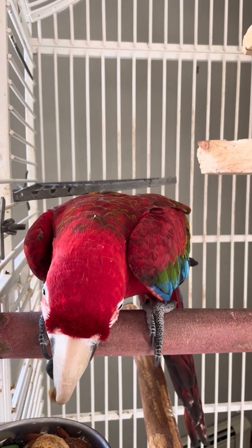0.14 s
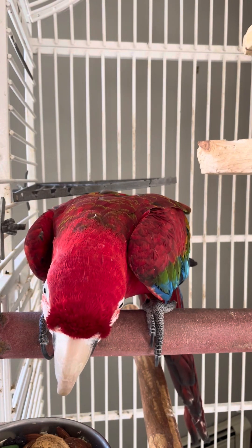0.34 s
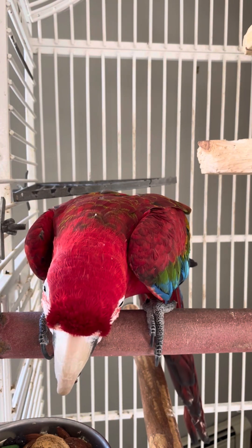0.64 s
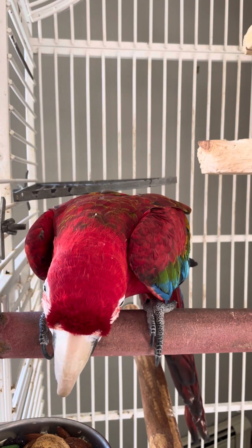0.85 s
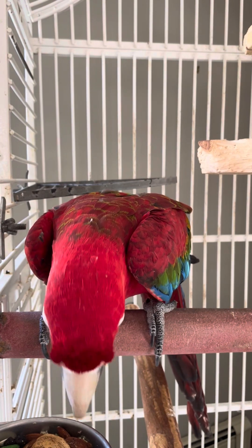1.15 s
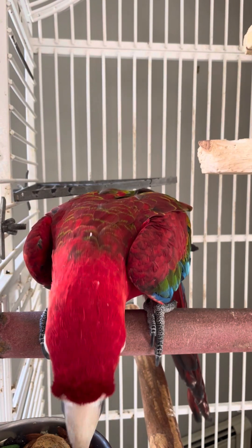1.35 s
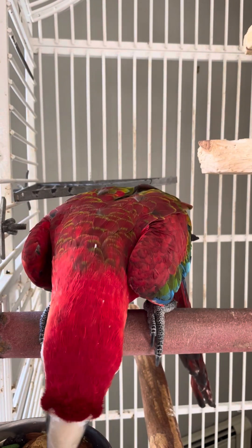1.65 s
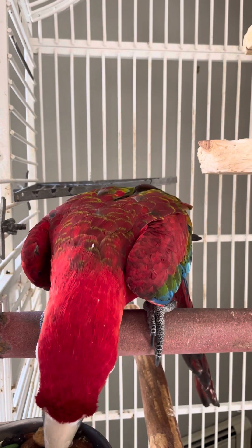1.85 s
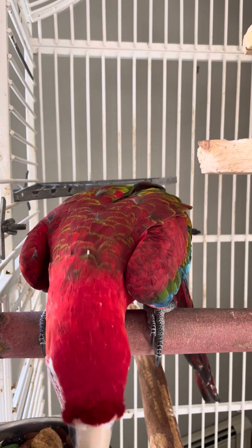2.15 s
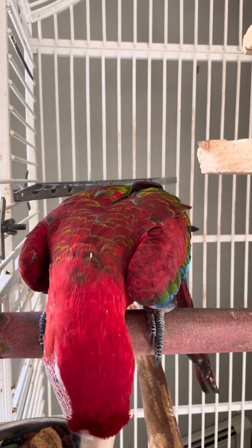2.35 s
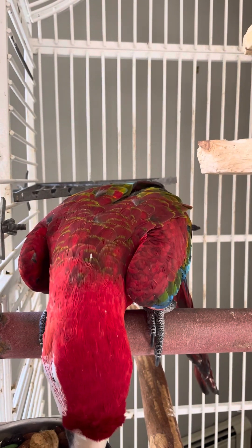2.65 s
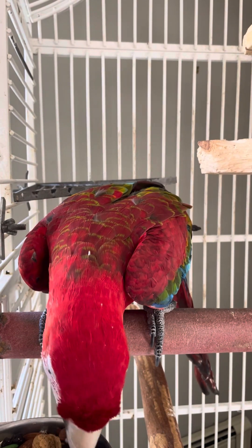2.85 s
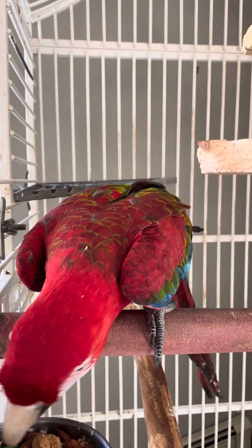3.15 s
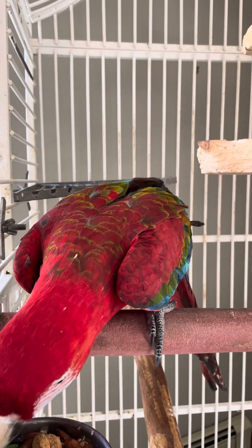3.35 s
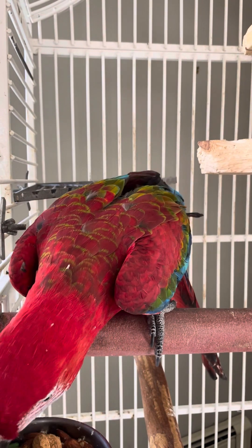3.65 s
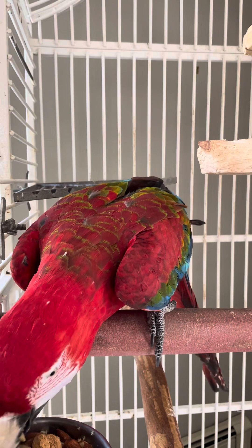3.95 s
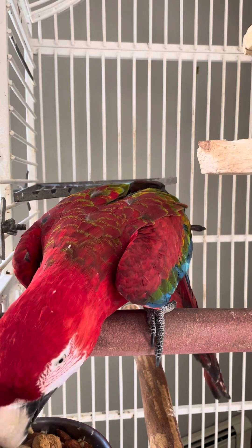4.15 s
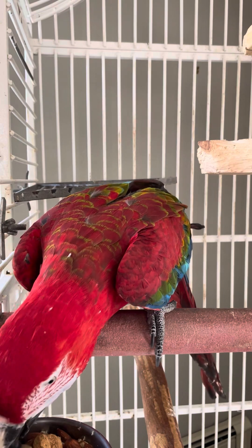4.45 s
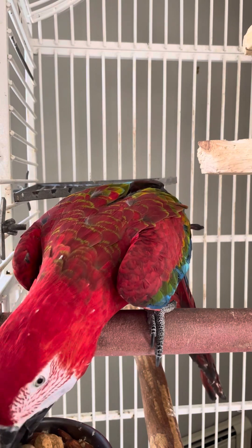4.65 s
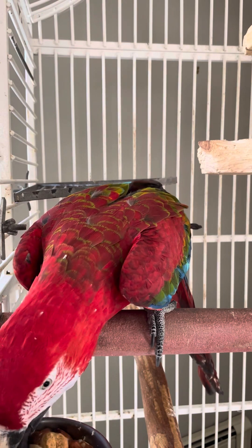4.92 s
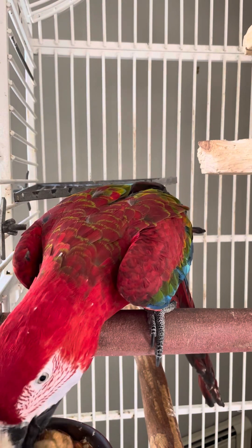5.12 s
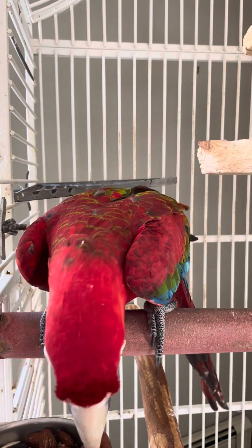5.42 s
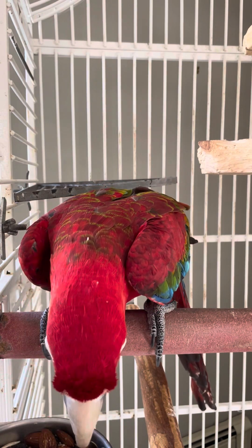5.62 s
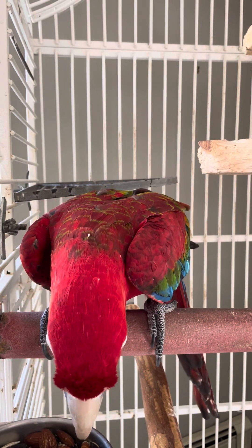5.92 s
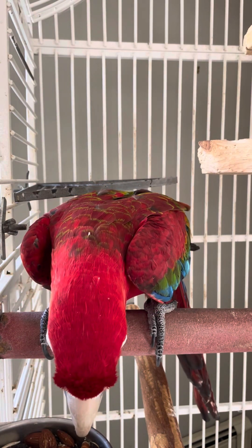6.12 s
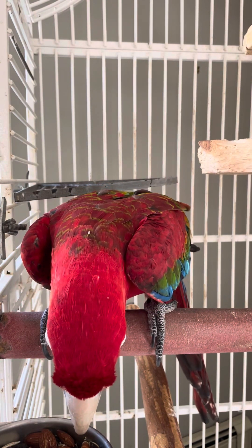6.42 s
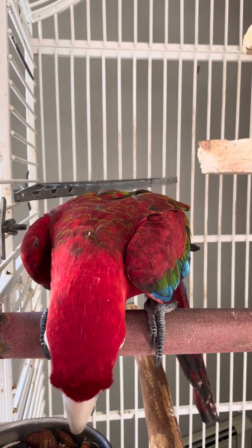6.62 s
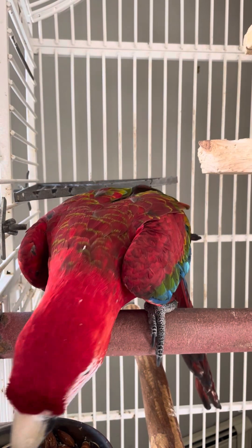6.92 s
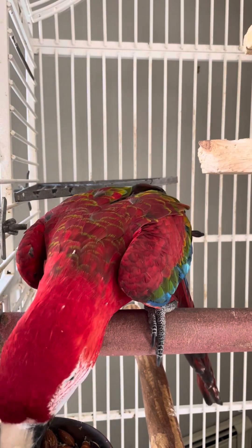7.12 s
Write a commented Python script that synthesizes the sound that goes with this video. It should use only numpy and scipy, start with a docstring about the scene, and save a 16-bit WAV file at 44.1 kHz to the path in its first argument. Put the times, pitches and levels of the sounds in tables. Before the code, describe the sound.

A large parrot nibbles nuts from a steel bowl, its beak ticking and knocking, with a brief loud clatter in a quiet room.

```python
"""The hum and hiss of a quiet home, then a large parrot's beak ticking on nuts in a steel food bowl.
Stirred seeds and shells crackle, and the cage rumbles as it rocks under the bird. Knocks of the beak
ring the bowl, thump its holder and set the bars singing, hardest between five and six seconds.
It all plays close to a two-port phone microphone, with a widened midrange and a short room tail."""
import sys
import numpy as np
from scipy import signal
from scipy.fft import rfft, irfft, next_fast_len
from scipy.io import wavfile
from scipy.ndimage import uniform_filter1d

SR = 44100
rng = np.random.default_rng(int(sys.argv[2]) if len(sys.argv) > 2 else 0)


def digitize_waveform(pressure):
    """Quantize a signal to 16-bit integers and store it at the path in sys.argv[1].

    Rows of a 2-D input are taken as channels; values are limited to [-1, 1].
    """
    field = np.atleast_2d(pressure).T
    bounded = np.clip(field, -1, 1)
    quanta = np.round(bounded * 32767).astype(np.int16)
    wavfile.write(sys.argv[1], SR, quanta)


N = 320772


def amp(db):
    """Decibels to gain."""
    return 10 ** (np.asarray(db) / 20)


def unit_rms(x):
    """Scales a signal to an rms of 1."""
    return x / np.sqrt(np.mean(x ** 2) + 1e-20)


def curve_at(points, hz):
    """Reads a curve along a log-frequency axis."""
    point_hz, value = np.transpose(points)
    return np.interp(np.log(hz + 1), np.log(point_hz + 1), value)


def place(mix, start_s, sound):
    """Drops a sound into the mix."""
    part = mix[round(start_s * SR):][:len(sound)]
    part += sound[:len(part)]


def band(x, low_hz, high_hz):
    """Causal band-pass."""
    return signal.sosfilt(signal.butter(2, [low_hz, min(high_hz, SR / 2.2)], "band", fs=SR, output="sos"), x)


def wander(span):
    """Random drift of rms 1, smoothed twice over span samples."""
    return unit_rms(uniform_filter1d(uniform_filter1d(rng.standard_normal(N), span), span))


# How alike diffuse sound is at the two ports: freq_hz, coherence
PORT_COHERENCE = [(60, 0.83), (200, 0.98), (400, 0.52), (1000, 0.088), (1800, 0.89), (2400, 0.28),
                  (4400, 0.21), (5200, 0.52), (7000, 1)]
def diffuse(spectra, hz):
    """Blends two unrelated spectrograms into a partly alike left and right."""
    alike = np.clip(curve_at(PORT_COHERENCE, hz), -1, 1)[:, None]
    return np.array([spectra[0], alike * spectra[0] + np.sqrt(1 - alike ** 2) * spectra[1]])


# Colour of the hiss: freq_hz, relative_db
HISS_COLOUR = [(30, -53.5), (45, -6), (120, -3), (300, -1.5), (550, -7), (800, -8), (1900, -19.5),
               (2500, -18.5), (4400, -32.5), (5600, -25.5), (6500, -15), (7600, -14), (8400, -51.5),
               (14500, -40)]
# Duct resonances: centre_hz, width_hz, boost_db
DUCT_PEAKS = [(231.7, 160, 6.5), (1074, 170, 7), (1655, 130, 8.5), (2158, 110, 11.5)]
def ventilation(level_db=-56.5):
    """A bed of air noise with broad duct peaks; patches of its spectrum swell and fade."""
    frames, hz = N // 256 + 5, np.fft.rfftfreq(1024, 1 / SR)
    re_a, im_a, re_b, im_b, patches = rng.standard_normal((frames, 513, 5)).T
    patches = unit_rms(uniform_filter1d(uniform_filter1d(patches, 12, axis=0), 14, axis=1))
    drift_db = 2 * patches * np.minimum(hz / 600, 1)[:, None]
    ducts_db = sum(boost / (1 + (2 * (hz - centre) / width) ** 2) for centre, width, boost in DUCT_PEAKS)
    colour_db = curve_at(HISS_COLOUR, hz) + ducts_db
    spectra = diffuse([re_a + 1j * im_a, re_b + 1j * im_b], hz) * amp(colour_db[:, None] + drift_db)
    return amp(level_db) * unit_rms(signal.istft(spectra, nperseg=1024, noverlap=768)[1][:, :N])


# Appliance tones: pitch_hz, rms_db
HUM_TONES = [(425.3, -72), (473.7, -74.5), (500.6, -72), (522.2, -70)]
def appliance_hum():
    """Faint tones that waver by about a decibel, each with its own phase at each port."""
    hum = np.zeros((2, N))
    for pitch_hz, rms_db in HUM_TONES:
        waver_db = unit_rms(uniform_filter1d(rng.standard_normal(N), 8000))
        phase = 2 * np.pi * pitch_hz * np.arange(N) / SR + rng.uniform(0, 4.8, (2, 1))
        hum += np.sqrt(2) * amp(rms_db + waver_db) * np.sin(phase)
    return hum


# Fader ride of the rumble: time_s, level_db
RUMBLE_RIDE = [(0, -74), (1.8, -69), (2.25, -60.5), (4.2, -71.5), (5.1, -57.5), (5.6, -62.5), (5.8, -50),
               (6.3, -56), (7.27, -63.5)]
def cage_rumble():
    """The frame rumbles low as the cage rocks under the bird."""
    time_s, level_db = np.transpose(RUMBLE_RIDE)
    rumble = unit_rms(band(band(rng.standard_normal(N), 33, 150), 33, 150))
    return rumble * amp(np.interp(np.arange(N) / SR, time_s, level_db))


# Fader ride of the stirring: time_s, gain_db
STIR_RIDE = [(0, -89), (1.0, -90), (1.9, -88.5), (2.25, -79), (2.9, -81.5), (3.1, -93), (3.4, -77.5),
             (4.2, -92), (4.45, -77.5), (5.08, -76), (5.221, -59), (5.45, -78.5), (5.74, -78), (5.84, -51),
             (5.93, -57), (6.051, -58), (6.25, -81.5), (6.599, -95), (7.27, -81)]
def food_crackle(grains_per_s=3000, settle_s=0.028):
    """Seeds and shells click in clumps, stirred in fits and thrown about by each cued knock or click."""
    t = np.arange(N) / SR
    clumps = amp(3.2 * wander(700))
    sizes = amp(np.minimum(rng.exponential(1, N), 5)) * rng.choice([-1, 1], N)
    grains = sizes * clumps * (rng.random(N) < grains_per_s / SR)
    crackle = unit_rms(band(grains, 7700, 11670)) + amp(5) * unit_rms(band(grains, 1143, 7600))
    time_s, gain_db = np.transpose(STIR_RIDE)
    fits_db = 2.5 * wander(SR // 14)
    stirred = amp(np.interp(t, time_s, gain_db) + fits_db)
    thrown = sum((t > start_s) * amp(-51 + 0.7 * level_db) * np.exp(-abs(t - start_s) / settle_s)
                 for start_s, level_db, *_ in KNOCK_CUES + CLICK_CUES)
    return crackle * (stirred + thrown)


def contact(level_db, centre_hz, width_oct, crack_db, scrape_ms, noise):
    """A hard tick and a short scrape through the hollow of beak and shell, a bright crack on top."""
    t = np.arange(len(noise)) / SR
    width_oct = max(width_oct, 0.1)
    tick = np.zeros(len(noise))
    tick[8] = 3 + (5 + 8 / width_oct) / max(scrape_ms, 1)
    scrape = (noise + tick) * (1 - np.exp(-t / 0.000067)) * np.exp(-1000 * t / scrape_ms)
    spread = 2 ** (width_oct / 2)
    blow = band(scrape, centre_hz / spread, centre_hz * spread)
    crack = band(scrape, 6780, 12400)
    return amp(level_db) * (blow / abs(blow).max() + amp(crack_db) * crack / abs(crack).max())


def ring(modes, t, gain_db, chance):
    """Dying modes; two rows of chance vary their strength (the blow) and tuning (the loose load)."""
    pitch_hz, level_db, t60_s = np.transpose(modes)[:, :, None]
    size, detune = chance[:, :len(modes), None]
    envelope = (np.sign(size) + 0.2 * size) * amp(level_db + gain_db - 60 * t / t60_s)
    return (envelope * np.sin(2 * np.pi * pitch_hz * (1 + 0.006 * detune) * t)).sum(0)


def octaves_from(modes, hz):
    """Each mode's distance above a pitch, in octaves."""
    return np.log2(np.array(modes)[:, :1] / hz)


def spot_gain_db(modes, spot_hz, spot_db, reach_oct=0.05):
    """The struck spot lifts the mode at spot_hz, or dips it when the spot is a node."""
    return spot_db * np.exp(-(octaves_from(modes, spot_hz) / reach_oct) ** 2)


# Modes of the steel bowl: pitch_hz, level_db, base_t60_s
BOWL_MODES = [(955, -4, .08), (1388, -11, .07), (1705, -7, .13), (2145, -2, .08), (2420, -12, .08),
              (2794, -13, .1), (2925, -8, .14), (3095, -4, .08), (3125, -14, .2), (3220, -7, .13),
              (3600, -13, .08), (4215, -5, .09), (4690, -9, .08), (5090, -8, .07), (5400, -8, .08),
              (5570, -9, .06), (6060, -10, .06)]
def bowl_ring(t, centre_hz, width_oct, decay_scale, spot, chance, noise):
    """Steel rings near the blow's colour, damped by beak and food and kept alive by their rattle."""
    rattle = (t == 0) + 0.03 * min(decay_scale, 1) * noise * np.exp(-t / 0.017)
    colour_db = np.maximum(-6 * (2 * octaves_from(BOWL_MODES, centre_hz) / width_oct) ** 2, -21)
    damped = np.array(BOWL_MODES) * [1, 1, decay_scale]
    steel = ring(damped, t, colour_db + spot_gain_db(BOWL_MODES, *spot), chance)
    return signal.fftconvolve(steel, rattle)[:len(t)] * (1 - np.exp(-t / 0.00045))


# Modes of the holder and cage wall: pitch_hz, level_db, t60_s
HOLDER_MODES = [(95, -13, .2), (149, 3, .21), (196, -12, .2), (240, -11, .3), (262, -9, .28),
                (342, -4, .16), (372, -10, .14), (437, -7, .16), (487, -11, .2), (510, -6, .27),
                (614, -14, .16), (797, -2, .1), (818, -7, .16), (900, -8, .17), (1203, -13, .14)]
def holder_thump(t, thump_hz, spot, chance, noise, attack_s=0.004):
    """The holder answers just behind the blow with low modes and a noisy thud."""
    colour_db = -octaves_from(HOLDER_MODES, thump_hz) ** 2
    body = ring(HOLDER_MODES, t, colour_db + spot_gain_db(HOLDER_MODES, *spot), chance)
    thud = 0.7 * unit_rms(band(band(noise, 180, 1100), 180, 1100)) * np.exp(-t / 0.015)
    return amp(-8) * (body + thud) * (1 - np.exp(-t / attack_s))


# Beak and nuts against the bowl; the two sends are relative to level_db:
# start_s, level_db, centre_hz, width_oct, scrape_ms, ring_send_db, decay_scale,
# thump_send_db, thump_hz, spot_hz, spot_db
KNOCK_CUES = [(0.2182, -29, 6370, 0.48, 1.7, -25, .3, -21.5, 1200, 1203, -2),
              (2.1504, -33, 890, 0.64, 1.9, -5, 0.27, -22, 920, 1705, 20),
              (2.231, -46, 835, 0.49, 4.3, -10, .4, -3.5, 800, 810, 12),
              (2.3277, -38, 840, 0.67, 1.7, -5, 0.25, -24, 900, 2145, 15),
              (2.414, -39.5, 900, .6, 1.9, 0, 0.28, -15, 900, 2145, 18),
              (4.9774, -33, 2530, 2.54, 8.6, -20, 1.24, -12.5, 855, 810, 11),
              (5.2494, -25.5, 1910, 3.1, 8.8, -2.5, 0.35, -16, 900, 2145, 4.5),
              (5.2542, -46.5, 3700, 0.8, 2.7, 0, 0.81, -28, 900, 4215, 5.5),
              (5.285, -31, 1670, 1.6, 4, -6.5, 0.52, -15, 900, 3220, -2),
              (5.338, -32.5, 3000, 3.9, 2.3, -3.5, 0.82, -14, 900, 2145, -17.5),
              (5.345, -50, 1700, 0.28, 2.3, 4, 1.85, -34.5, 900, 1705, 2),
              (5.4165, -35, 4600, 1.1, 6.1, -9.5, 0.66, -34.5, 885, 4690, 4),
              (5.4851, -2.5, 4860, 1.6, 2, -40, 0.5, -38.5, 706, 915, 21.5),
              (5.4908, -14.5, 3120, 0.24, 1.7, -1, 0.27, -22.5, 404, 614, 16.5),
              (5.7435, -6, 5950, 0.53, 0.72, -15, 0.32, -9.5, 246, 5090, 17),
              (5.7443, -16, 2540, 2.52, 17.5, -19, 1.3, -18.5, 442, 510, 11.5),
              (5.749, -17.5, 800, 0.5, 7.5, -37, 1, -7.5, 700, 342, 0.5),
              (5.789, -30.5, 3200, 0.11, 19, -22, 0.42, -8, 387, 500, 2),
              (5.9405, -27.5, 2200, 3.76, 21.5, -20.5, .8, -10, 224.6, 614, 16),
              (6.0682, -20.5, 3470, 1.2, 3.3, -14.5, 0.59, -16.5, 405, 345, 11)]
def bowl_knocks():
    """Each knock layers contact, bowl and holder. Returns the sound and the jolts it gives the bars."""
    t = np.arange(SR // 4) / SR
    knocks, jolts = np.zeros(N), np.zeros(N)
    for (start_s, level_db, centre_hz, width_oct, scrape_ms, ring_send_db, decay_scale,
         thump_send_db, thump_hz, *spot) in KNOCK_CUES:
        bowl_chance, holder_chance = rng.standard_normal((2, 2, 20))
        noise = rng.standard_normal(len(t))
        crack_db = -12.5 + 4 * min(np.log2(centre_hz / 2500), 0)  # dull blows crack less
        hit = contact(level_db, centre_hz, width_oct, crack_db, scrape_ms, noise)
        bowl = bowl_ring(t, centre_hz, width_oct, decay_scale, spot, bowl_chance, noise)
        thump = holder_thump(t, thump_hz, spot, holder_chance, noise)
        jolt = amp(level_db + thump_send_db)
        place(knocks, start_s, hit + amp(level_db + ring_send_db) * bowl + jolt * thump)
        jolts[round(start_s * SR)] = jolt
    return knocks, jolts


# Long-ringing modes of the bars: pitch_hz, level_db, t60_s
BAR_MODES = [(388, -31, 3.6), (727, -35, 1.5), (759, -28, .9), (1254, -30, .7)]
def cage_bars(jolts, swell_s=0.27, beat_hz=3.3, beat_depth=0.41, trough_s=6.14, waver_db=5):
    """Energy from each thump creeps into the bars; being alike, they beat and waver."""
    t = np.arange(2 * SR) / SR
    even_strike = np.array([np.ones(len(BAR_MODES)), np.zeros(len(BAR_MODES))])
    bars = ring(BAR_MODES, t, 0, even_strike) * (1 - np.exp(-t / swell_s))
    beat = 1 - beat_depth * np.cos(2 * np.pi * beat_hz * (np.arange(N) / SR - trough_s))
    return amp(waver_db * wander(700)) * beat * signal.fftconvolve(jolts, bars)[:N]


def beak_click(level_db, centre_hz, scrape_ms):
    """A tick over the beak's woody note; higher ticks are broader, with less body and a weaker crack."""
    noise = rng.standard_normal(3000)
    up_oct = np.log2(centre_hz / 3000)
    body_db = level_db - 7.5 - 6.8 * max(up_oct, 0)
    body = contact(body_db, centre_hz=2100, width_oct=0.93, crack_db=-11, scrape_ms=6.1, noise=noise)
    width_oct = 1.71 + 0.43 * up_oct
    crack_db = -11 - 2.5 * min(up_oct, 1)
    return body + contact(level_db, centre_hz, width_oct, crack_db, scrape_ms, noise)


# Dry ticks of the beak: start_s, level_db, centre_hz, scrape_ms
CLICK_CUES = [(0.2212, -35.5, 5240, 0.69), (0.2248, -41, 7400, .8), (.264, -69, 10600, 1.3),
              (.309, -54, 9800, 2.2), (1.08, -49.5, 1750, 14), (1.456, -56.5, 4150, 15),
              (1.655, -53.5, 3140, 12), (1.858, -50.5, 2800, 2), (1.877, -47, 2100, 0.97),
              (2.227, -40, 4300, 13), (2.271, -44, 4030, .7), (2.374, -44, 2170, 4.8),
              (2.739, -55, 2380, 12), (2.905, -57, 8000, 6.5), (3.009, -46.5, 2880, 5.4),
              (3.257, -46.5, 2900, 1.2), (3.287, -40, 3080, 1.6), (3.396, -63, 1940, 2.1),
              (3.965, -49.5, 3300, 5.3), (4.3056, -57, 2500, 1.8), (4.4797, -51, 3100, 3.2),
              (4.9083, -44.5, 1890, 2), (4.919, -40.5, 4850, 2), (5.119, -39.5, 5300, 6.1),
              (5.129, -37.5, 4460, 1.7), (5.1754, -49.5, 4460, 4), (5.238, -36, 2415, 1.2),
              (5.296, -29, 9660, 0.5), (5.339, -34.5, 1294, 3.5), (5.3499, -17.5, 5710, 4.6),
              (5.433, -39, 5850, 4.1), (5.8394, -28, 9550, 7.8), (5.848, -23.5, 9700, 3.5),
              (5.878, -24.5, 6170, 4.7), (5.887, -28, 8900, 6.8), (6.102, -23.5, 6640, 1.5),
              (6.123, -34, 5030, 2.1), (6.2679, -48, 2160, 3.2), (6.97, -55, 2980, 11)]
def nibbling(gap_scale_s=0.2273):
    """The beak works on shells and nuts: cued clicks, with faint ones at random in between."""
    clicks = np.zeros(N)
    for start_s, *cue in CLICK_CUES:
        place(clicks, start_s, beak_click(*cue))
    start_s = 0
    for _ in range(60):
        wait, size, pitch = rng.standard_normal(3)
        start_s += abs(wait) * gap_scale_s
        faint = beak_click(level_db=-70.5 + 0.97 * size, centre_hz=3500 * 1.4 ** pitch, scrape_ms=1.3)
        place(clicks, start_s, faint)
    return clicks


def stereo_spread(close, send_db=-10.5):
    """A very short, opposite-polarity smear that widens the midrange of the close sounds."""
    taps = band(rng.standard_normal(400) * np.exp(-np.arange(400) / 90), 320, 3300)
    smear = amp(send_db) * signal.oaconvolve(close, taps / np.linalg.norm(taps))[:N]
    return np.array([smear, -smear])


# Decay of the room: freq_hz, t60_s
ROOM_DECAY = [(100, 0.33), (500, 0.74), (2000, 0.51), (3300, 0.39), (6000, 0.23), (12000, 0.098)]
def room_tail(close, send_db=-10.5):
    """Sparse random reflections, each band dying at its own speed."""
    taps = np.zeros((2, SR))
    arrivals = np.arange(240, SR - 20, 20) + rng.integers(0, 20, (2, (SR - 241) // 20))
    np.put_along_axis(taps, arrivals, rng.choice([-1., 1.], arrivals.shape), 1)
    hz, t, spectra = signal.stft(taps, SR, nperseg=256)
    decay = amp(-60 * t / curve_at(ROOM_DECAY, hz)[:, None])
    tail = signal.istft(diffuse(spectra, hz) * decay, SR, nperseg=256)[1]
    return amp(send_db) * signal.fftconvolve(close[None], tail / np.linalg.norm(tail[0]), axes=1)[:, :N]


def scene():
    """Bird and bowl up close, widened and sent to the room, over a bed of rumble, hiss and hum."""
    clicks = nibbling()
    knocks, jolts = bowl_knocks()
    close = clicks + knocks + cage_bars(jolts) + food_crackle()
    return close + stereo_spread(close) + room_tail(close) + cage_rumble() + ventilation() + appliance_hum()


# Balance of the ports: freq_hz, left_minus_right_db
PORT_BALANCE = [(40, 0), (150, -2.5), (300, -6), (600, -5.5), (1200, -1), (2500, 1), (6000, -0.8)]
# Phase between the ports: freq_hz, right_lag_rad
PORT_LAG = [(100, .01), (1000, 0.43), (2100, 0.067), (2650, 2.05), (3700, .3), (5200, 0.055), (7900, 3.44),
            (11000, 7.2), (14300, 9.4), (17000, 9.75)]
def record(dry, cutoff_hz=16900):
    """The microphone leans right in the low mids, its right port lags in the treble, and the top is cut."""
    size = next_fast_len(N + 4096)
    hz = np.fft.rfftfreq(size, 1 / SR)
    left_gain = amp(curve_at(PORT_BALANCE, hz) / 2)
    lag_rad = np.interp(hz, *np.transpose(PORT_LAG))
    ports = np.array([left_gain, np.exp(-1j * lag_rad) / left_gain])
    picked_up = irfft(rfft(dry, size) * ports, size)[:, :N]
    low_pass = signal.firwin(511, cutoff_hz, window=("kaiser", 9), fs=SR)
    return signal.oaconvolve(picked_up, low_pass[None], "same")


dry = scene()
out = record(dry)
digitize_waveform(out)
```